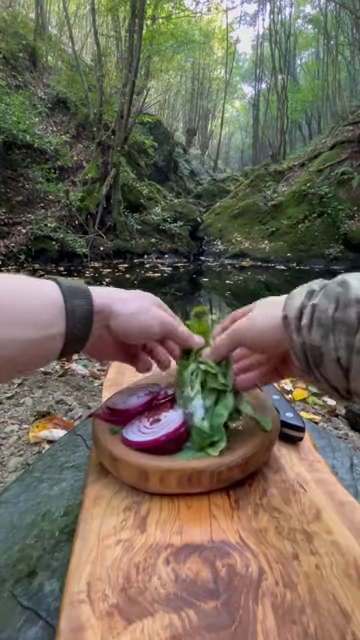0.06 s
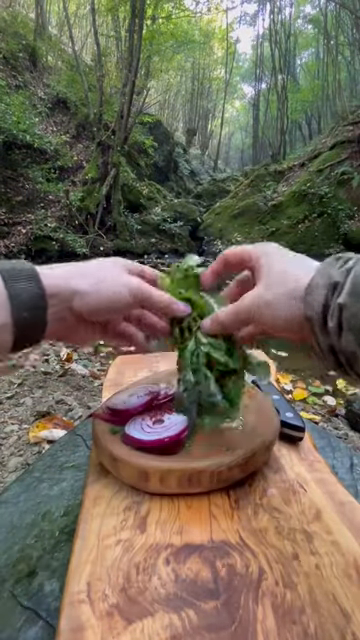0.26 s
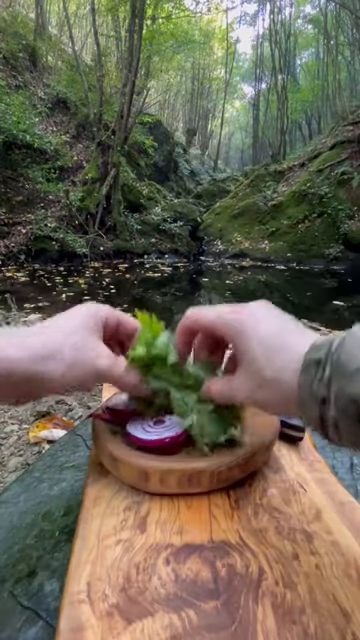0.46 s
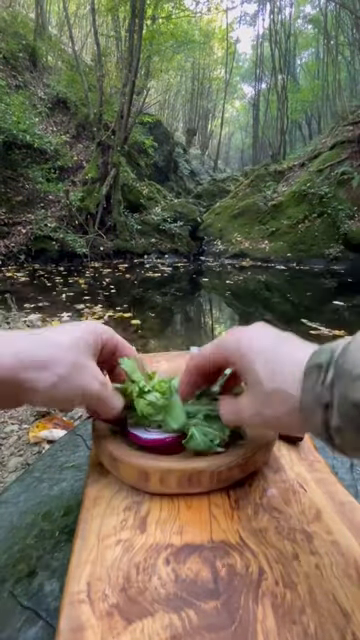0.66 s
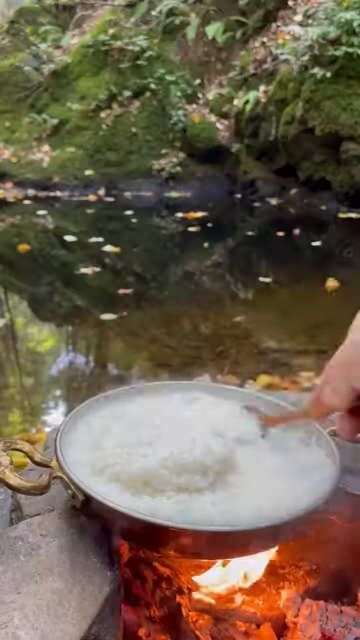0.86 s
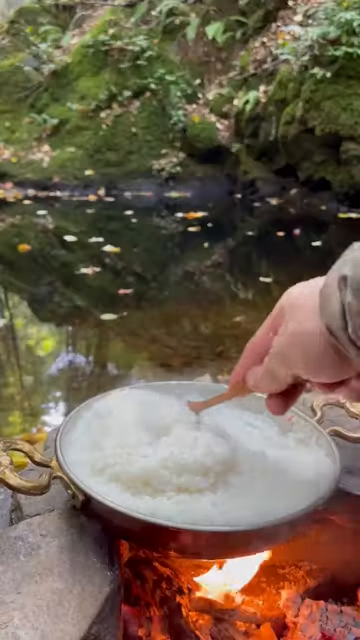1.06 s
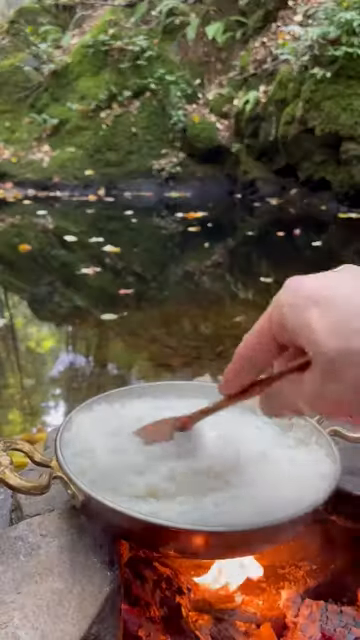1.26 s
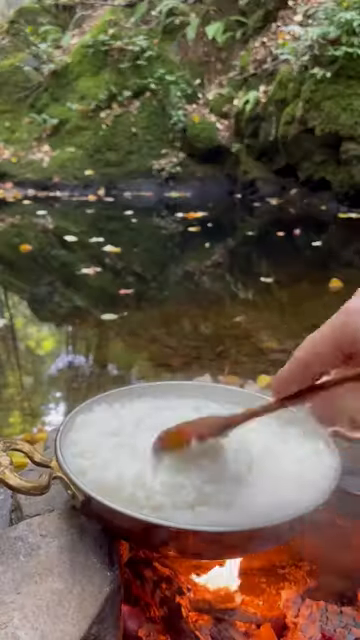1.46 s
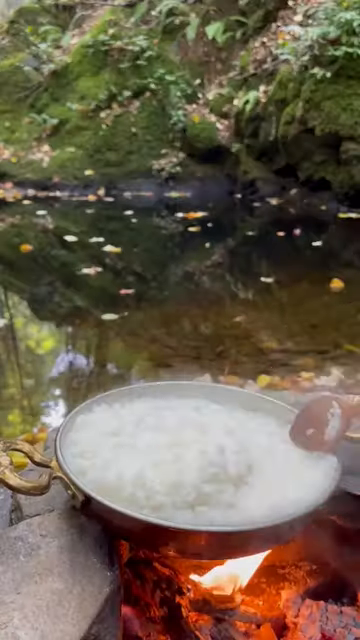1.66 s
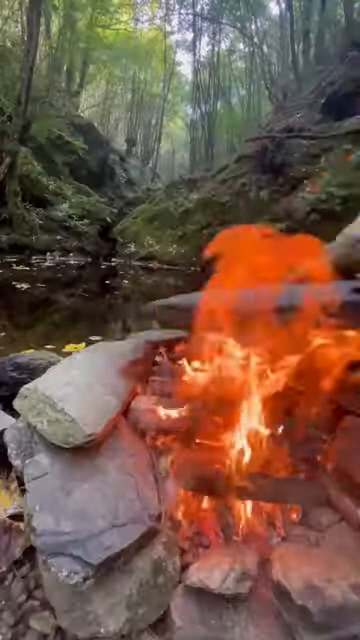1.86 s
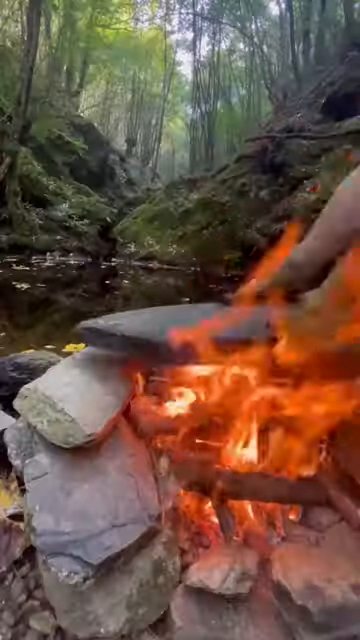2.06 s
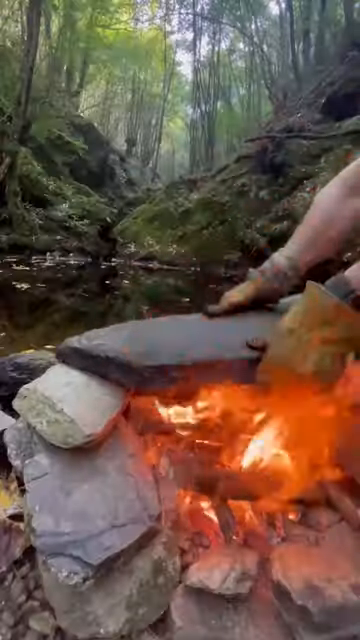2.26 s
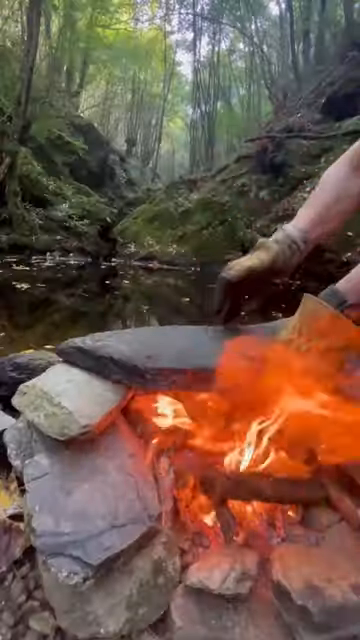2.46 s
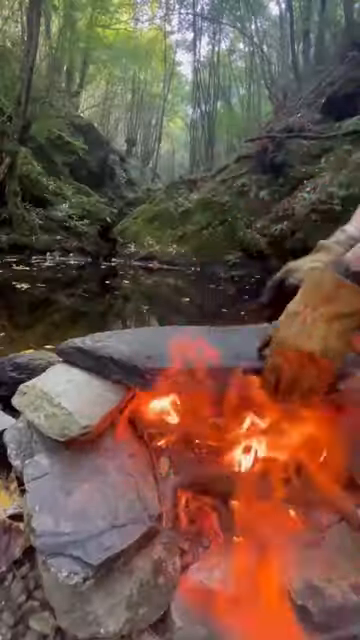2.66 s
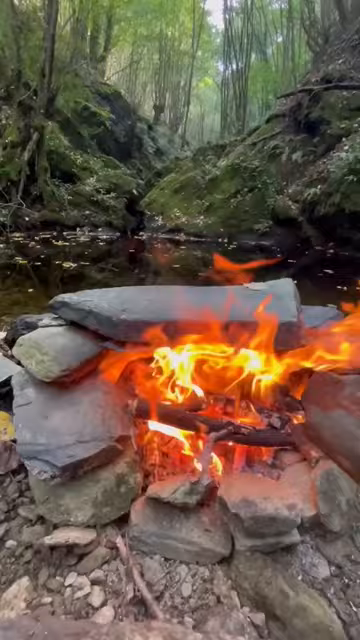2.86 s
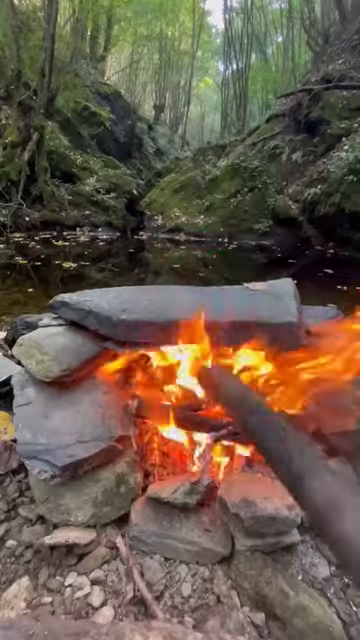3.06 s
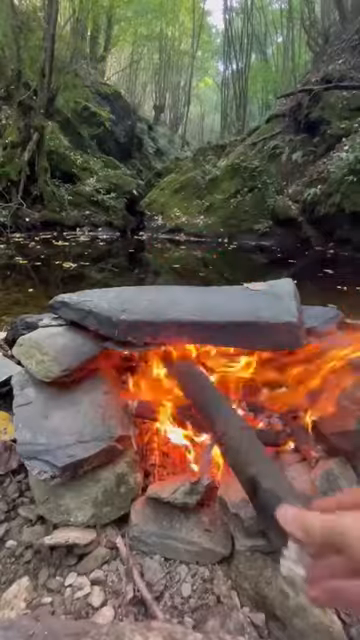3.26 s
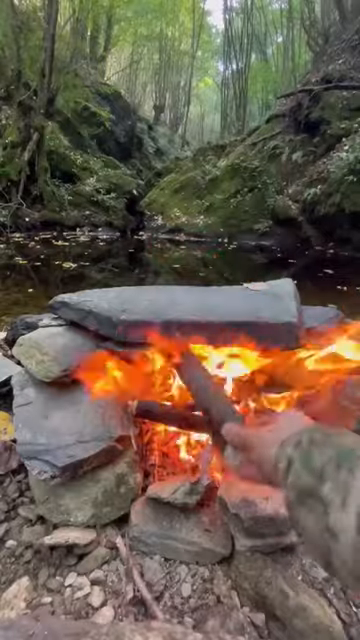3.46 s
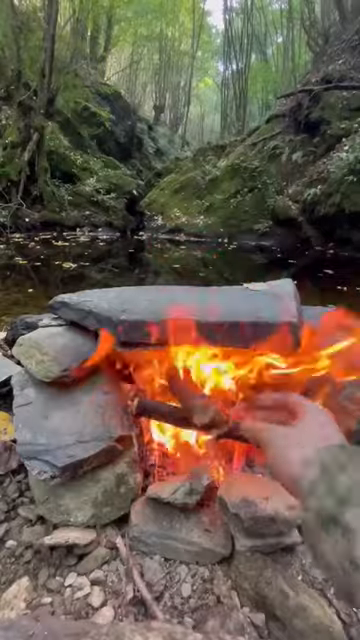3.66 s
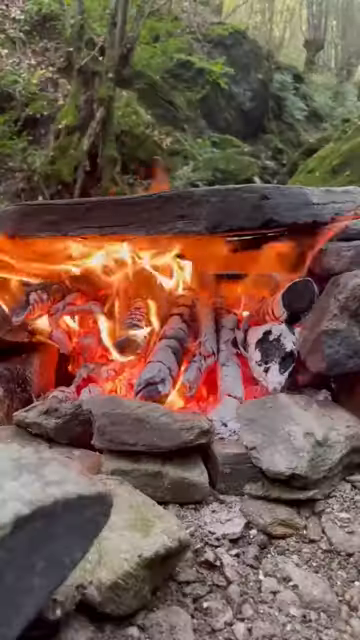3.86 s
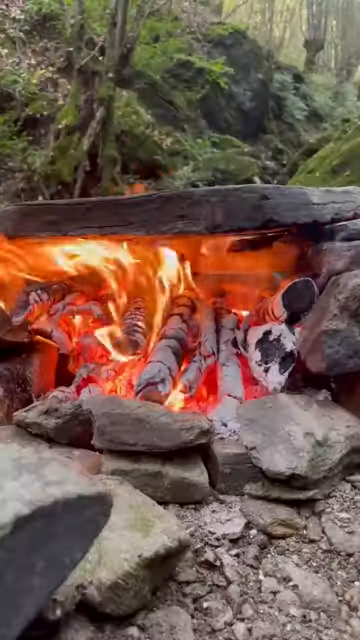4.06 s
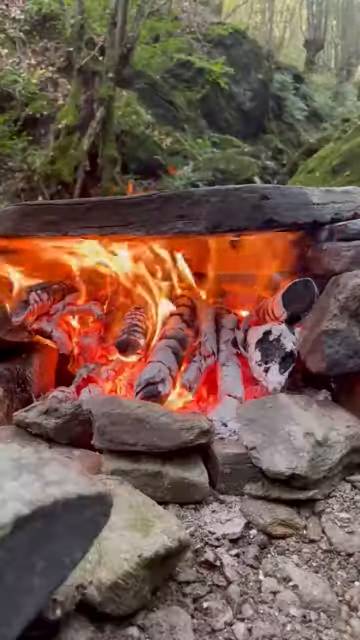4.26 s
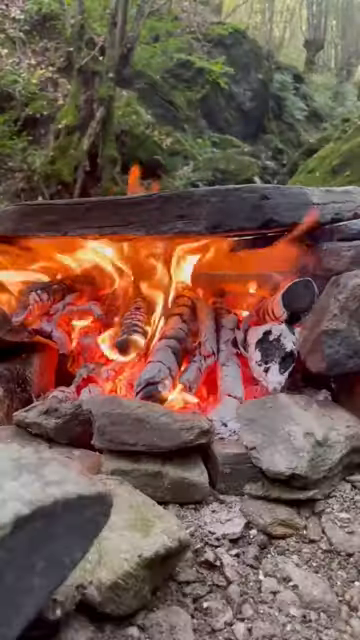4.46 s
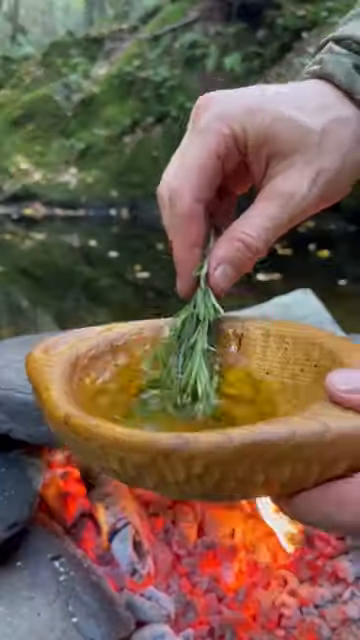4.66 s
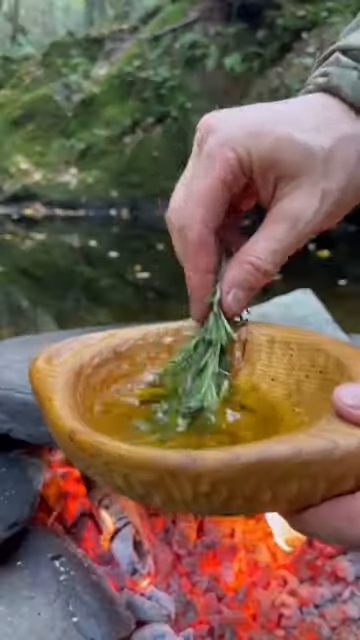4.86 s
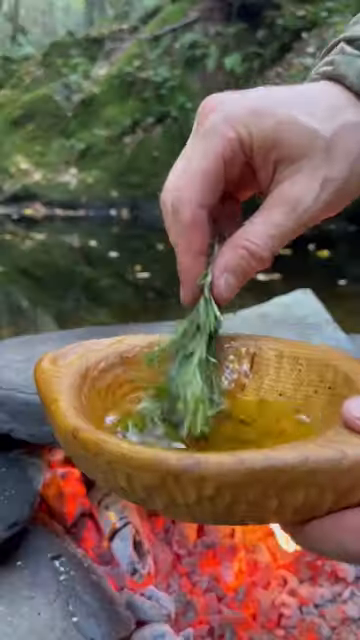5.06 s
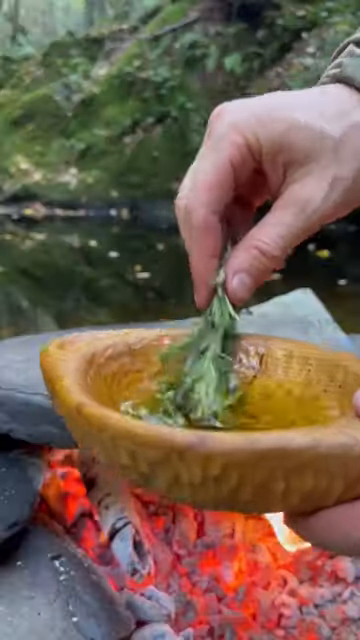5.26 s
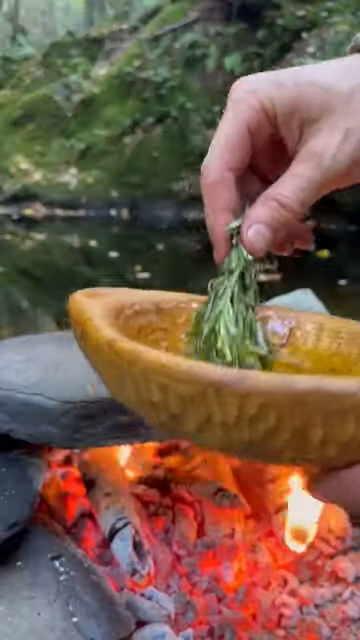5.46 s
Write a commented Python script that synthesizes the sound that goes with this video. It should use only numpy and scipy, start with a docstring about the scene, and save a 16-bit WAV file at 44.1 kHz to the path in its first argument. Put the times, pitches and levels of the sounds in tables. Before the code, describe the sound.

Six quick outdoor cooking shots: leaves rustle and snap, a pot bubbles, a heavy stone slab clacks down over fire, embers crackle, herbs swirl in oil.

```python
"""Cooking beside a forest stream

Six short scenes joined by hard cuts, each with its own bed of coloured-noise hiss and flame flutter.
Leaves rustle in a wooden bowl, a spoon stirs a pot over a wood fire, a stone slab is set down on the rocks,
a stick rakes the embers, the fire spits, and a sprig of herbs is dipped in oil for the hot stone.
Rubbing is noise mixed with random slips, breaks are filtered noise bursts, stone rings as damped modes.
"""
import sys
import numpy as np
from scipy import signal
from scipy.fft import rfft, irfft
from scipy.io import wavfile
from scipy.ndimage import uniform_filter1d

SR = 44100
rng = np.random.default_rng(int(sys.argv[2]) if len(sys.argv) > 2 else 0)


def int16_out(signal):
    """Quantize to a 16-bit WAV file."""
    q = np.round(np.clip(np.atleast_2d(signal).T, -1, 1) * 32767)
    wavfile.write(sys.argv[1], SR, q.astype(np.int16))


N = 243431
TIME = np.arange(N) / SR


def amp(db):
    """Turns decibels into gain."""
    return 10 ** (np.asarray(db) / 20)


def unit(x):
    """Scales to rms 1."""
    return x / np.sqrt(np.mean(x ** 2) + 1e-20)


def at_hz(points, hz):
    """Reads a spectrum on a log-frequency axis."""
    f, value = np.transpose(points)
    return np.interp(np.log(hz + 1), np.log(f + 1), value)


def level(curve):
    """Gain along a level curve, practically silent outside it."""
    s, db = np.transpose(curve)
    return amp(np.interp(TIME, s, db, left=-140, right=-140))


def swells(rows):
    """Gain of smooth humps, each rising and sinking over its length."""
    gain = 0
    for s, db, length in rows:
        position = np.clip((TIME - s) / length, -.5, .5)
        gain = gain + amp(db) * np.cos(np.pi * position)
    return gain


def dying(s, db, db_per_s, rise_s):
    """Gain that jumps up at time s and fades steadily."""
    age = np.maximum(TIME - s, 0)
    return np.minimum(age / rise_s, 1) * amp(db - db_per_s * age)


def add(mix, s, sound):
    """Mixes a sound in at time s."""
    part = mix[:, max(round(s * SR), 0):][:, :sound.shape[-1]]
    part += sound[..., :part.shape[1]]


# Likeness of the two channels, before each sound's own width: hz, likeness (0-1)
LIKENESS = [(30, .5), (60, 0.65), (150, 0.7), (300, 1), (680, 0.7), (1400, 0.9), (3000, 1), (12000, 0.8)]


def noise(colour, patch_db, flicker_db, alike):
    """Two partly alike channels of coloured noise, with drifting patches and quick flicker; rms 1."""
    hz = np.fft.rfftfreq(2 * N, 1 / SR)
    like = np.clip(alike * at_hz(LIKENESS, hz), -1, 1)
    spectra = rfft(rng.standard_normal((2, 2 * N)))
    mid, side = spectra * np.sqrt([1 + like, 1 - like]) * amp(at_hz(colour, hz))
    stereo = irfft(np.array([mid + side, mid - side]))[:, :N]
    z = signal.stft(stereo, nperseg=1024, noverlap=768)[2]
    # patches differ across pitch and time; flicker moves all pitches together
    patches = uniform_filter1d(rng.standard_normal(z.shape[1:]), size=5, axis=0)
    patches = unit(uniform_filter1d(patches, size=5, axis=1))
    flicker = unit(uniform_filter1d(rng.standard_normal(z.shape[2]), size=3))
    uneven = z * amp(patch_db * patches + flicker_db * flicker)
    return unit(signal.istft(uneven, nperseg=1024, noverlap=768)[1][:, :N])


def causal(gain_db):
    """The sharpest causal pulse (minimum phase) with the given spectrum, floored at -80 dB."""
    log_gain = np.log(amp(np.maximum(gain_db, -80)))
    circle = np.concatenate([log_gain, log_gain[-2:0:-1]])
    return np.fft.ifft(np.exp(np.conj(signal.hilbert(circle)))).real


def crack(hz, skirt_db, t60, break_s, splinter, spread):
    """A short break and a dying spray, ringing in a broad band; loudest 2 ms at rms 1."""
    t = np.arange(4096) / SR
    envelope = np.exp(-t / break_s) + splinter * amp(-60 * t / max(t60, .002))
    mid, side = rng.standard_normal((2, len(t))) * envelope
    ripple_db = 10 * np.log10(uniform_filter1d(abs(rfft(mid)) ** 2, size=25))
    octaves = np.log2((np.fft.rfftfreq(len(t), 1 / SR) + 20) / hz)
    # rounded peak, a little steeper above than below
    slope_db = np.where(octaves < 0, .85, 1.15) * skirt_db
    colour_db = -slope_db * (np.hypot(octaves, .4) - .4)
    # the mid band also evens out part of its own random ripple
    mid = signal.fftconvolve(mid, causal(colour_db - 0.21 * ripple_db))
    side = signal.fftconvolve(side, causal(colour_db))
    sound = unit(mid) + np.outer([spread, -spread], unit(side))
    return sound / np.sqrt(uniform_filter1d((sound ** 2).mean(0), size=88).max())


def ring(modes, rise_s, chatter):
    """Damped modes, neighbours swinging opposite ways; loose contact makes each waver."""
    t, sides = np.arange(SR // 2) / SR, np.array([[.5], [-.5]])
    out = np.zeros((2, len(t)))
    for k, (hz, db, t60, phase) in enumerate(modes):
        drift = unit(uniform_filter1d(rng.standard_normal((2, len(t))), size=260))
        waver = chatter * (1 - np.exp(-t / 0.0061)) * drift  # sets in over some 6 ms
        swing = np.sin(2 * np.pi * hz * t + sides * phase + waver[1])
        out += (-1) ** k * amp(db - 60 * t / t60) * (1 + .5 * waver[0]) * swing
    return out * (1 - np.exp(-t / rise_s))


def grains(per_s, scatter_db, low_hz, high_hz, cycles, count=24):
    """Random tiny ticks of many pitches and sizes, each pitch in its own place; rms 1."""
    out = np.zeros((2, N))
    for hz in np.geomspace(low_hz, high_hz, count):
        u = np.arange(int(6 * cycles * SR / hz) + 4) * hz / SR / cycles
        sizes = amp(scatter_db * np.minimum(rng.exponential(1, N), 3.5))
        ticks = (rng.random(N) < per_s / count / SR) * sizes
        tick = unit(u * np.exp(-2 * u) * np.sin(2 * np.pi * cycles * u)) / np.sqrt(len(u))
        pan = rng.uniform(-.5, .5)
        out += np.outer([1 + pan, 1 - pan], signal.oaconvolve(ticks, tick)[:N])
    return unit(out)


def rubbing(gain, colour, slips_per_s, grainy, alike):
    """Many small slips over a smooth scrape, both in the colour of the material."""
    slips = (rng.random(N) < slips_per_s / SR) * rng.standard_normal(N) * rng.uniform(0.14, 1, (2, N))
    body = causal(at_hz(colour, np.fft.rfftfreq(2048, 1 / SR)))
    slips = unit(signal.oaconvolve(slips, body[None], axes=1)[:, :N])
    scrape = noise(colour, patch_db=2, flicker_db=1, alike=alike)
    return gain * unit(grainy * slips + scrape)


# The six scenes: start_s, end_s
SCENES = [(0, .793), (.793, 1.779), (1.779, 2.859), (2.859, 3.776), (3.776, 4.756), (4.756, 5.53)]


def scene_gain(start, end):
    """Quick fade-in over 25 ms at a cut, held until the next cut."""
    fade = np.interp(TIME - start, [0, .008, .025], [.3, .4, 1], left=0) * (TIME < end)
    return uniform_filter1d(fade, size=60)


# Colour of the stream and fire in each scene: hz, relative level_db (per Hz)
HISS_BOWL = [(22, -28), (50, -6.5), (300, -2.5), (480, -11.5), (680, -17), (900, -3.5), (1400, -3.5),
             (3600, -3.5), (5200, -8), (10800, -2), (11900, -19), (13000, -51)]
HISS_POT = [(260, 8), (450, 0.5), (1200, 2.5), (2400, 5), (4850, 1), (7500, 2), (11000, 7.5), (13000, -33)]
HISS_SLAB = [(260, -19.5), (450, -4), (830, -17), (1500, -17.5), (2500, -11.5), (3950, -17), (10700, -12),
             (12000, -15), (13500, -49)]
HISS_STICK = [(260, 5.5), (450, -1.5), (763, -4.5), (1350, -9), (3460, -7), (7530, -9.5), (10900, -6.5),
              (11900, -14), (14000, -41.5)]
HISS_COALS = [(450, -20), (1050, -17.5), (1700, -10), (2900, -9.5), (4800, -9), (6500, -7.5), (11000, -5.5),
              (13500, -28)]
HISS_OIL = [(260, -23), (450, 0), (1840, -10.5), (4850, -1.5), (7200, 1.5), (11000, -5.5), (13000, -44)]
HISSES = [HISS_BOWL, HISS_POT, HISS_SLAB, HISS_STICK, HISS_COALS, HISS_OIL]
# Loudness of that hiss, one value a scene: level_db (rms)
HISS_DB = [-56.5, -59, -51, -52, -62.5, -65]


def stream_and_fire_hiss():
    """Steady turbulence of stream and fire: coloured noise, recoloured at every cut."""
    out = np.zeros((2, N))
    for (start, end), colour, db in zip(SCENES, HISSES, HISS_DB):
        hiss = noise(colour, patch_db=2.2, flicker_db=1, alike=0.43)
        out += scene_gain(start, end) * amp(db) * hiss
    return out


# Colour of the flame flutter: hz, relative level_db (per Hz)
FLAME_COLOUR = [(15, -47.5), (25, -25.5), (55, -1), (75, 0), (132, -4.5), (262, -13.5), (565, -31.5),
                (653, -33.5), (800, -34), (1040, -58), (1760, -120)]
# Steady flutter, one value a scene; the bowl is away from the fire: level_db (rms)
FLAME_DB = [-76, -56.5, -39.5, -52.5, -54, -56.5]
# The fire flares up and sinks back: middle_s, level_db, length_s
FLARES = [(.89, -47, 0.21), (.95, -51.5, 0.046), (1.07, -44.5, 0.052), (1.195, -46, 0.11),
          (1.47, -45.5, 0.18), (1.61, -44.5, 0.09), (1.74, -45.5, 0.22), (3.43, -47, 0.036),
          (4.5, -47.5, 0.11), (4.72, -49, 0.089), (4.82, -54, 0.3)]


def flames():
    """Low flutter of burning gas: bass-heavy noise that swells with each flare."""
    flutter = noise(FLAME_COLOUR, patch_db=2.2, flicker_db=1.8, alike=0.91)
    flares = swells(FLARES)
    out = np.zeros((2, N))
    for (start, end), db in zip(SCENES, FLAME_DB):
        out += scene_gain(start, end) * np.hypot(amp(db), flares) * flutter
    return out


# Leaves rubbing, loudness over time: time_s, level_db
LEAVES = [(0, -52.5), (.06, -58), (.13, -56), (.2, -56), (.255, -58), (.3, -66), (.36, -60), (.45, -73),
          (.49, -52.5), (.52, -50), (.6, -49), (.655, -47), (.68, -54), (.75, -56.5), (.785, -55.5),
          (.795, -76)]
# Colour of the leaves: hz, relative level_db (per Hz)
LEAF_COLOUR = [(350, -75), (600, -4), (694, -14), (952, 0.5), (2560, 7.5), (5070, 1.5), (10200, 4.5),
               (12000, 1), (14000, -77)]


def leaves():
    """Leaves pressed into the bowl: dry, bright slips over a soft scrape."""
    return rubbing(level(LEAVES), LEAF_COLOUR, slips_per_s=660, grainy=0.68, alike=0.78)


# Soft knocks and wet plops of bowl, spoon, stick and oil, level before the trims in the function:
# start_s, level_db, pitch_hz, t60_s, glide (octaves per s)
PLOPS = [(.191, -46, 760, 0.13, 40), (0.25, -43, 1760, 0.053, 4), (1.022, -46, 2300, 0.024, 0),
         (1.083, -42.5, 2130, 0.045, 0), (1.124, -45.5, 1136, 0.076, -0.5),
         (1.564, -42.5, 1010, 0.075, -2.5), (3.405, -48.5, 1072, 0.077, -3.5), (3.666, -29, 802, 0.07, -4),
         (4.695, -52, 1730, 0.079, 3.5), (4.924, -48.5, 1860, 0.053, 1), (5.028, -52.5, 1330, 0.07, 3),
         (5.056, -47.5, 660, 0.12, 1.5), (5.101, -43, 1910, 0.046, 8), (5.295, -47.5, 930, 0.07, 5.5)]


def plops():
    """Soft knocks and drips: a muffled burst around a short gliding note."""
    out, t = np.zeros((2, N)), np.arange(SR // 4) / SR
    for s, db, hz, t60, glide in PLOPS:
        turns = np.cumsum(hz * 2 ** np.clip(glide * t, -1, 1)) / SR
        burst = crack(hz, skirt_db=18.0, t60=t60, break_s=0.002, splinter=0.66, spread=0.18)
        note = amp(-60 * t / t60) * np.sin(2 * np.pi * turns) * (1 - np.exp(-t / 0.0023))
        add(out, s, amp(db - 8.5) * burst)
        add(out, s, amp(db - 2.5) * note)
    return out


# Stems breaking in the bowl: start_s, level_db
STEMS = [(.515, -21.5), (0.6535, -40.5), (0.6934, -42)]


def stems():
    """Sharp, close snaps of stems: broad bursts centred on 3260 Hz."""
    out = np.zeros((2, N))
    for s, db in STEMS:
        snap = crack(3260, skirt_db=9.5, t60=0.012, break_s=0.0017, splinter=.77, spread=0.12)
        add(out, s, amp(db) * snap)
    return out


# Hand on bowl, spoon on pot, the slab rocking on its bed, logs shifting; level before rattle and balance:
# time_s (arrival of the top of the body), level_db (pulse peak), top_hz
KNOCKS = [(.54, -50.5, 302), (0.863, -35, 1910), (1.176, -39, 320), (1.744, -34, 347), (1.908, -30.5, 856),
          (2.241, -14.5, 1033), (2.276, -32, 450), (2.323, -30, 1380), (2.351, -29, 440), (2.367, -27, 520),
          (2.386, -31.5, 650), (2.398, -31, 397), (2.4439, -22, 597), (2.45, -15, 695.4), (2.49, -27, 1017),
          (2.5, -25.5, 420), (2.573, -32, 470), (2.8299, -36, 1284), (3.1089, -39.5, 790),
          (3.666, -37.5, 415), (4.222, -50, 600), (4.483, -44.5, 329.8), (4.74, -51.5, 490)]
KNOCK_LOW_HZ, KNOCK_TILT_DB, KNOCK_SKIRT_DB = 169, -1.5, 26  # bottom of body; dB per octave inside, outside
KNOCK_LAG_S = 0.006543  # travel time of bending waves at 1 kHz; lower ones are slower
RATTLE_SHARE, RATTLE_T60_S = 0.59, 0.11  # part of the blow that rattles on among the stones


def knocks():
    """Dead blows: low notes arrive late, so the pulse drops in pitch, with a short rattle behind."""
    out = np.zeros((2, N))
    hz, t = np.fft.rfftfreq(4096, 1 / SR) + 1, np.arange(4096) / SR
    travel = np.exp(-4j * np.pi * KNOCK_LAG_S * np.sqrt(1000 * hz))
    for s, db, top_hz in KNOCKS:
        outside = np.maximum(np.log2(hz / top_hz), 0) + np.maximum(np.log2(KNOCK_LOW_HZ / hz), 0)
        body_db = KNOCK_TILT_DB * np.log2(hz / KNOCK_LOW_HZ) - KNOCK_SKIRT_DB * outside
        pulse = irfft(amp(body_db) * travel)
        scatter = rng.standard_normal((2, len(t))) * amp(-60 * t / RATTLE_T60_S)
        rattle = signal.fftconvolve(pulse[None], scatter / np.linalg.norm(scatter[0]))[:, :len(t)]
        blow = (pulse + RATTLE_SHARE * rattle) / abs(pulse).max()
        add(out, s - KNOCK_LAG_S * np.sqrt(1000 / top_hz), amp(db) * blow)
    return out * amp([[-1.0], [1.0]])  # leans right


# Colour of oil burbling under the herbs: hz, relative level_db (per Hz)
BURBLE_COLOUR = [(200, -5), (400, -10), (650, -10), (1000, -5), (1800, -2), (3000, -1), (5000, -24)]


def bubbles():
    """Small bubbles in pot and oil as pitched grains, and the oil's burble as patchy noise."""
    in_pot, in_oil = ((TIME > start) & (TIME < end) for start, end in (SCENES[1], SCENES[-1]))
    fizz = grains(per_s=130, scatter_db=3, low_hz=900, high_hz=3400, cycles=6)
    burble = amp(-68.5) * noise(BURBLE_COLOUR, patch_db=5.5, flicker_db=2, alike=1.0)
    return (amp(-69) * in_pot + amp(-73.5) * in_oil) * fizz + in_oil * burble


def ticking():
    """Faint random ticks of the embers, heard in every scene by the fire."""
    ticks = grains(per_s=30, scatter_db=3, low_hz=5000, high_hz=10000, cycles=2.5)
    return (TIME > SCENES[1][0]) * amp(-72.5) * ticks


# Pops of the burning wood: start_s, level_db, centre_hz, skirt (dB per octave), t60_s
POPS = [(1.3835, -46.5, 7600, 41, 0.063), (1.4356, -42, 5170, 3, 0.024), (1.7335, -17.5, 1660, 13, 0.017),
        (1.9067, -25.5, 2280, 23, 0.0093), (3.297, -35.5, 9500, 22, 0.038), (3.3197, -34, 8500, 6, 0.024),
        (3.596, -40.5, 7040, 15, 0.036), (3.653, -36, 7000, 11, 0.035), (3.699, -33, 9000, 8, 0.11),
        (3.8125, -48, 6490, 9, 0.015), (3.8205, -43.5, 9630, 14, 0.041), (3.8601, -22.5, 6500, 12, 0.012),
        (4.1279, -46, 9500, 16, .008), (4.138, -49.5, 6470, 13, 0.0071), (4.4606, -44.5, 7660, 28, 0.022),
        (4.491, -44.5, 10200, 23, .01), (4.5312, -33.5, 5800, 18, 0.022), (4.714, -34, 9800, 40, 0.011),
        (5.1533, -46, 7900, 11, 0.1), (5.099, -47, 6860, 42, 0.032), (5.225, -45, 7600, 37, 0.032),
        (5.338, -50, 5100, 53, 0.04)]
# Notes the wood rings with as it splits: start_s, level_db, pitch_hz, t60_s
SPLITS = [(1.7333, -19, 2130, 0.022), (1.7336, -12.5, 3110, 0.01), (3.318, -33.5, 4960, 0.03),
          (3.8603, -25, 3010, 0.0075), (4.5314, -36, 3180, 0.01)]


def wood_pops():
    """Wood bursting in the fire: sharp cracks, some with a brief note from the splitting fibres."""
    out = np.zeros((2, N))
    for s, db, hz, skirt_db, t60 in POPS:
        pop = crack(hz, skirt_db, t60, break_s=0.0018, splinter=1.0, spread=0.011)
        add(out, s, amp(db) * pop)
    for s, db, hz, t60 in SPLITS:
        add(out, s, ring([(hz, db, t60, 0)], rise_s=0.00042, chatter=.4))
    return out


# Gulps of air as the flames flap: middle_s, peak_db, pitch_hz, length_s
GULPS = [(2.046, -25.5, 70, 0.057), (2.111, -25, 90, 0.033), (2.845, -37, 49.8, 0.044),
         (5.386, -42, 62.03, 0.084)]


def flame_gulps():
    """Deep flaps of air: short bell-shaped bursts of a low tone."""
    out = np.zeros((2, N))
    for s, db, hz, length in GULPS:
        t = np.arange(0, length, 1 / SR)
        add(out, s - length / 2, amp(db) * np.hanning(len(t)) * np.sin(2 * np.pi * hz * t))
    return out


# Stone meeting stone and chips giving way, level before balance:
# start_s, level_db, centre_hz, skirt (dB per octave)
CONTACTS = [(2.2411, -7, 1500, 24), (2.2425, -25, 2700, 12), (2.2587, -30.5, 1570, 6),
            (2.4413, -11.5, 3040, 29.5), (2.4415, -12.5, 5100, 28.5), (2.4446, -17, 1800, 14),
            (2.4493, -16.5, 3100, 26), (2.4514, -18.5, 1400, 17.5), (2.468, -28.5, 1350, 12),
            (2.4895, -26.5, 1150, 30), (2.4922, -26, 2500, 29.5), (2.498, -29, 1400, 18),
            (2.508, -25, 2600, 43), (2.547, -40, 1580, 70)]
# Weight of the slab landing, gains on the modes below, before balance:
# start_s, slab_ring_db, rock_clink_db, ground_thud_db
LANDINGS = [(2.2408, -1.5, -34, -11.5), (2.441, -17.5, -15.5, -37.5), (2.4496, -9.5, -26.5, -8)]
# Modes of the slab, relative levels: pitch_hz, level_db, t60_s, left-right phase (radians)
SLAB = [(623, -26, 0.1, 1.5), (1192, -7.5, 0.05, 0.18), (1215, -28, .22, .2), (1330, 0, 0.02, .1),
        (1510, 1, 0.017, 0.12), (1616, -27, 0.07, .2), (2120, -16, 0.024, .2), (2700, -17, .014, .2),
        (3730, -24, 0.014, .3)]
# Modes of the rock it lands on, relative levels: pitch_hz, level_db, t60_s, left-right phase (radians)
ROCK = [(2827, -1, 0.04, 0.18), (3030, 2.5, 0.028, .2), (3310, 3, 0.028, .1), (5050, 5, 0.016, 0.37),
        (5656, -8, 0.025, 0.37)]
# Modes of the hearth stones and ground under them, relative levels:
# pitch_hz, level_db, t60_s, left-right phase (radians)
GROUND = [(131, -.5, .055, .1), (174, 9, 0.019, .1), (245, 0.5, 0.032, .2), (428, -14.5, 0.075, 0.47),
          (464, -14, 0.061, 0.29)]
# Chips that clink as the slab settles, level before balance: start_s, level_db, pitch_hz, t60_s
CLINKS = [(2.508, -22, 2760, 0.024), (2.5098, -17.5, 1720, 0.031), (2.5095, -27.5, 1593, 0.11)]


def slab():
    """The slab lands on one edge, rocks, lands again and settles; the ground answers a moment later."""
    out = np.zeros((2, N))
    for s, db, hz, skirt_db in CONTACTS:
        contact = crack(hz, skirt_db, t60=0.017, break_s=.0014, splinter=0.22, spread=0.22)
        add(out, s, amp(db) * contact)
    for s, ring_db, clink_db, thud_db in LANDINGS:
        add(out, s, amp(ring_db) * ring(SLAB, rise_s=.0004, chatter=.45))
        add(out, s, amp(clink_db) * ring(ROCK, rise_s=0.00046, chatter=.9))
        add(out, s + 0.0018, amp(thud_db) * ring(GROUND, rise_s=0.0022, chatter=0.31))
    for s, db, hz, t60 in CLINKS:
        add(out, s, amp(db) * ring([(hz, 0, t60, 0)], rise_s=0.0008, chatter=1))
    return out * amp([[-1.8], [1.4]])  # leans right


# Slab scraping after each landing and as it is nudged: start_s, level_db, fade (dB per s)
DRAGS = [(2.256, -33, 194.5), (2.366, -33.5, 127), (2.451, -32.5, 168.5), (2.79, -42.5, 63)]
# Colours of sliding stone, crushed grit and trickling grit: hz, relative level_db (per Hz)
SLIDE_COLOUR = [(60, -22), (120, -9.5), (200, -0.5), (300, -1.5), (430, -6), (700, -15.5), (1220, -14.5),
                (2500, -32.5), (5500, -71)]
GRIT_COLOUR = [(180, -1.5), (300, -13.5), (424, -26.5), (823, -24.5), (1570, -0.5), (1810, -9.5),
               (5210, -15), (9630, -36), (10900, -22), (13000, -57.5)]
TRICKLE_COLOUR = [(500, -15), (1000, -7), (1600, 2), (2200, 0), (3500, -4), (5000, -3.5), (6500, -8),
                  (8500, -30), (13000, -49.5)]
GRIT_S = 2.441  # the slab comes down on the grit


def slab_scrape():
    """Slab dragged over gritty rock: low slides, a crush of grit, and fine grit trickling to the cut."""
    drags = sum(dying(*row, rise_s=0.0031) for row in DRAGS)
    slide = rubbing(drags, SLIDE_COLOUR, slips_per_s=500, grainy=1, alike=0.36)
    crush = dying(GRIT_S, db=-24, db_per_s=256.5, rise_s=0.002)
    grit = rubbing(crush, GRIT_COLOUR, slips_per_s=700, grainy=0.8, alike=0.37)
    trickling = dying(GRIT_S, db=-41, db_per_s=41, rise_s=0.013)
    trickle = rubbing(trickling, TRICKLE_COLOUR, slips_per_s=3000, grainy=0.66, alike=.6)
    return (grit + trickle + slide) * (TIME < SCENES[2][1])


# Sap fizzing out of the wood: middle_s, level_db, length_s
SAP = [(3.35, -47, 0.057), (3.9, -53, 0.073), (4.268, -55, 0.048)]
# Colour of the fizz: hz, relative level_db (per Hz)
SAP_COLOUR = [(1500, -25), (4000, -29), (6500, -1.5), (8500, -30), (10700, 6), (13000, -18), (15500, -33)]


def sap():
    """Sap fizzing out of hot wood: short humps of thin, grainy treble."""
    return rubbing(swells(SAP), SAP_COLOUR, slips_per_s=1100, grainy=1.0, alike=1.0)


# Embers raked, loudness over time: time_s, level_db
EMBERS = [(3.58, -81), (3.597, -44.5), (3.648, -47), (3.668, -32), (3.705, -41.5), (3.72, -45),
          (3.765, -48.5), (3.775, -49.5)]
# Colour of the embers: hz, relative level_db (per Hz)
EMBER_COLOUR = [(150, -39.5), (250, -19), (379, 0), (627, -5), (786, -9), (1190, -13), (1700, -12.5),
                (5780, -10.5), (7490, -13.5), (10800, -4.5), (15800, -11)]


def embers():
    """A stick rakes the embers: coarse slips over a scrape."""
    return rubbing(level(EMBERS), EMBER_COLOUR, slips_per_s=800, grainy=1, alike=0.78)


# Strokes of the herbs through the oil: middle_s, level_db, length_s
SWISHES = [(4.945, -61.5, 0.12), (5.135, -61.5, 0.11), (5.34, -63, 0.23)]
# Colour of the wet swish: hz, relative level_db (per Hz)
SWISH_COLOUR = [(400, -8), (900, -19), (1900, 1), (3000, -0.5), (6000, -9.5)]


def herbs():
    """Herbs swirled in oil: each stroke a soft hump of slips and scrape."""
    return rubbing(swells(SWISHES), SWISH_COLOUR, slips_per_s=800, grainy=0.7, alike=1.0)


def forest(x, t60, top_hz):
    """A dull scatter from rocks and trunks: decaying, low-passed noise as an echo."""
    t = np.arange(SR // 2) / SR
    tail = rng.standard_normal((2, len(t))) * amp(-60 * t / t60) * (t > .005)
    tail = signal.lfilter(*signal.butter(1, min(top_hz, SR / 3), fs=SR), tail)
    return signal.fftconvolve(x, tail / np.linalg.norm(tail[0]), axes=1)[:, :N]


def scene():
    """All sources; hits, plops and bubbles scatter back from the forest."""
    hits = plops() + stems() + knocks() + bubbles() + wood_pops() + slab()
    scatter = amp(-28.0) * forest(hits, t60=0.14, top_hz=5958)
    handling = leaves() + slab_scrape() + sap() + embers() + herbs()
    surroundings = stream_and_fire_hiss() + flames() + flame_gulps() + ticking()
    return hits + scatter + handling + surroundings


def record(dry):
    """The loudest peaks clip; the top octave rolls off before the band limit."""
    rolloff = signal.firwin2(255, [0, 11700, 13000, 15000, SR / 2], [1, 1, .25, .1, .05], fs=SR)
    soft = signal.oaconvolve(np.clip(dry, -1, 1), rolloff[None], "same")
    band_limit = signal.firwin(511, 15600, window=("kaiser", 9), fs=SR)
    return signal.oaconvolve(soft, band_limit[None], "same")


dry = scene()
out = record(dry)
int16_out(out)
```